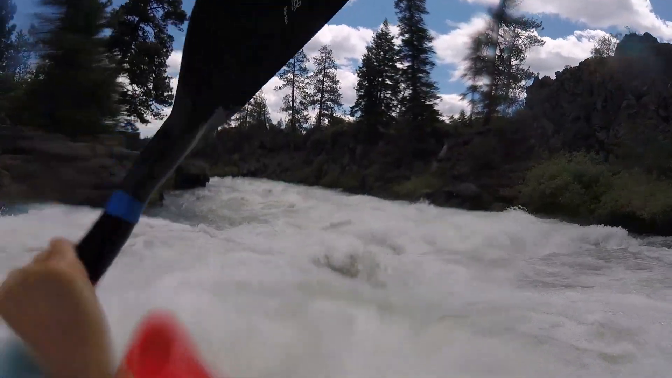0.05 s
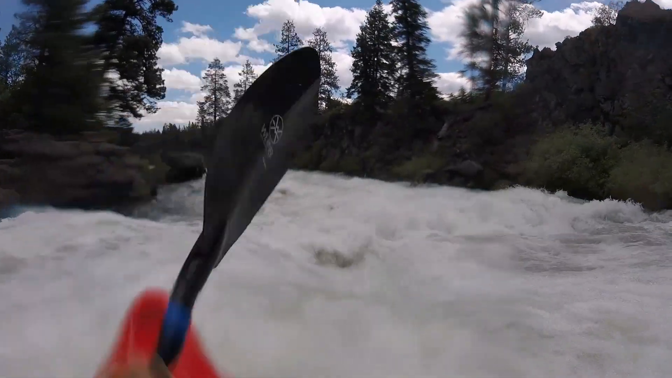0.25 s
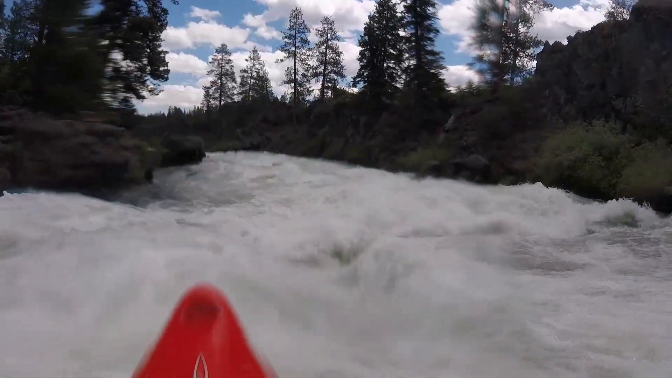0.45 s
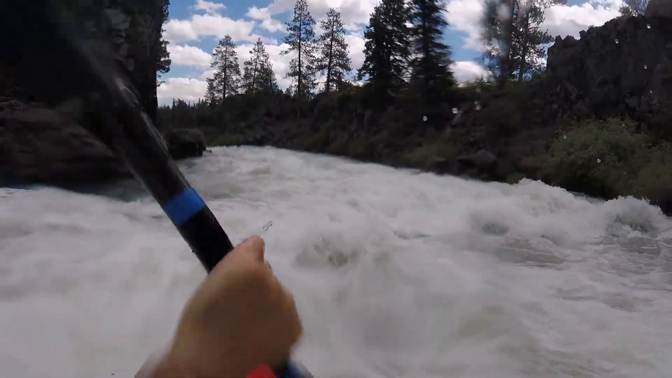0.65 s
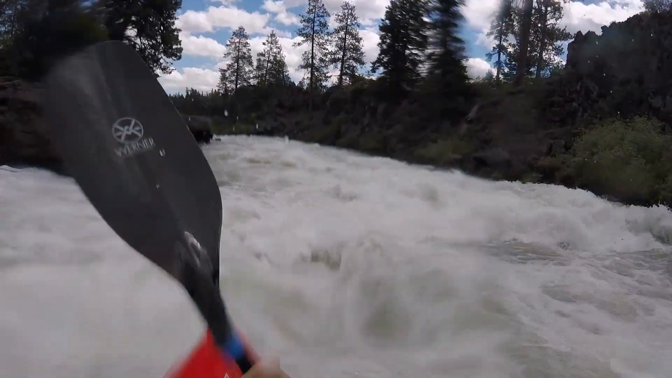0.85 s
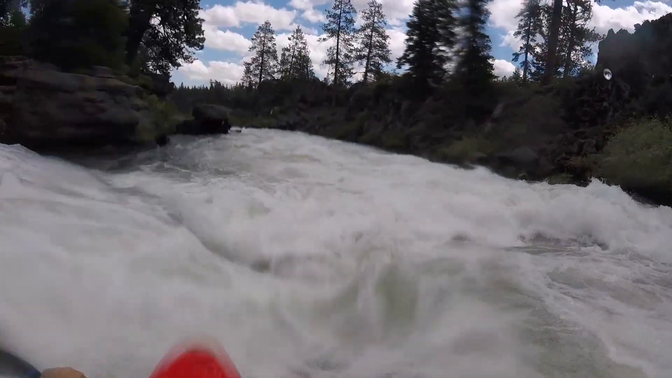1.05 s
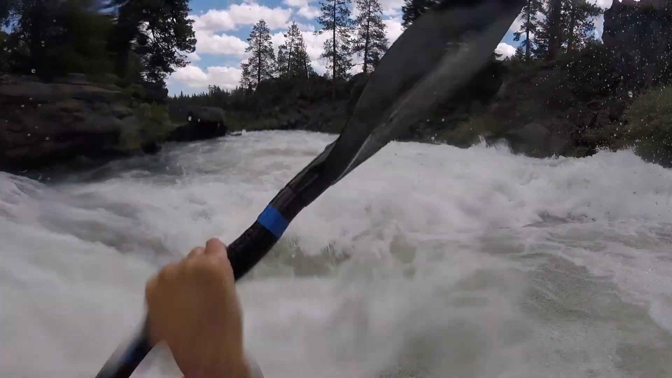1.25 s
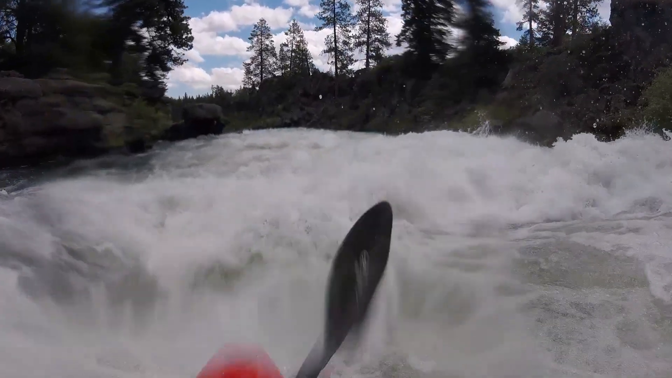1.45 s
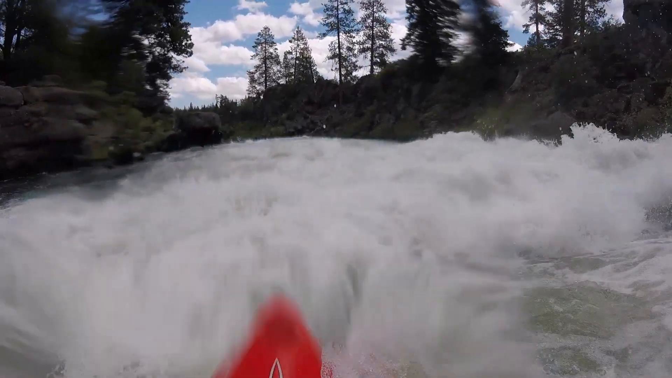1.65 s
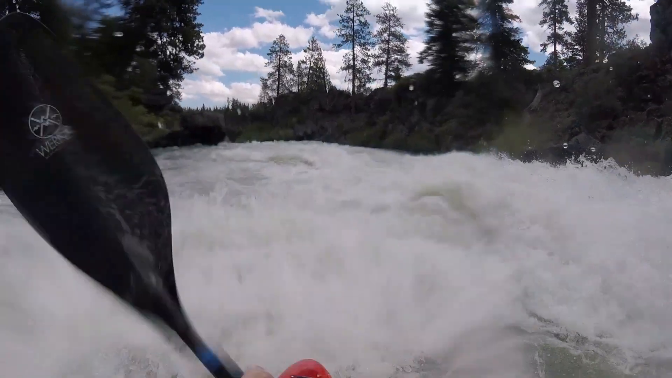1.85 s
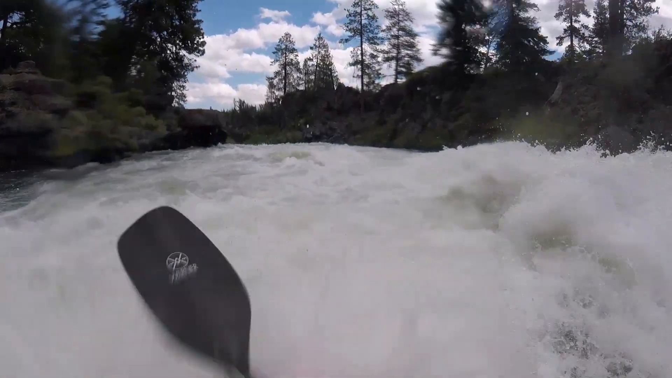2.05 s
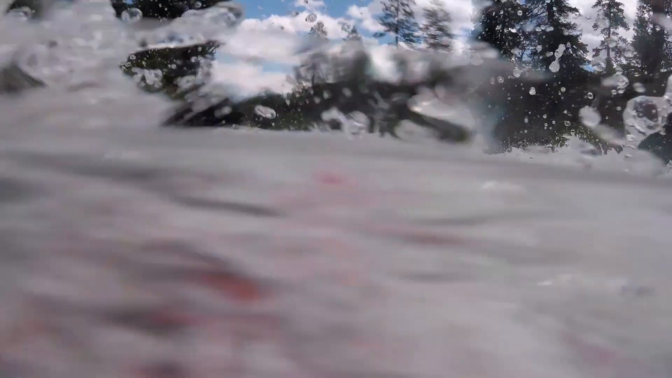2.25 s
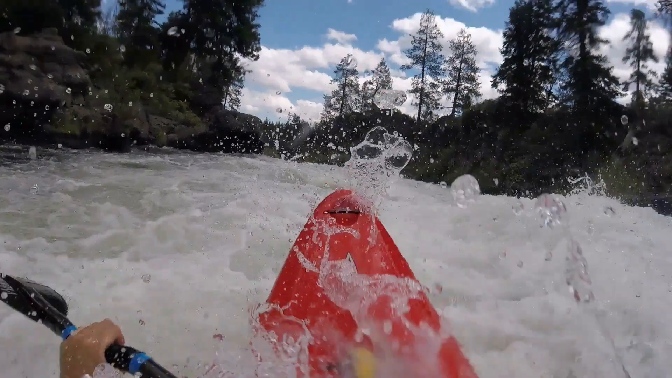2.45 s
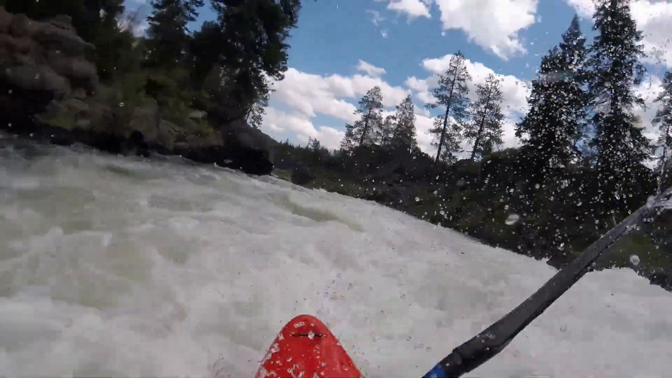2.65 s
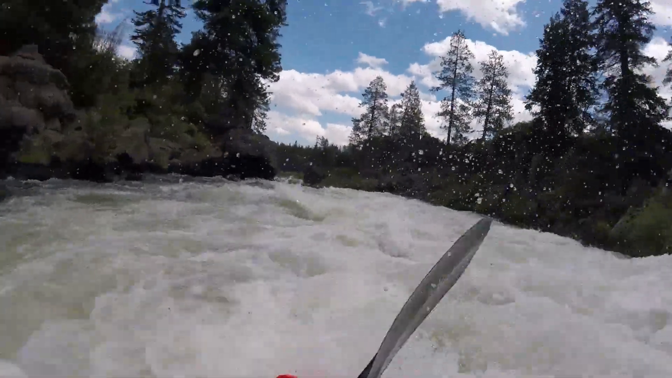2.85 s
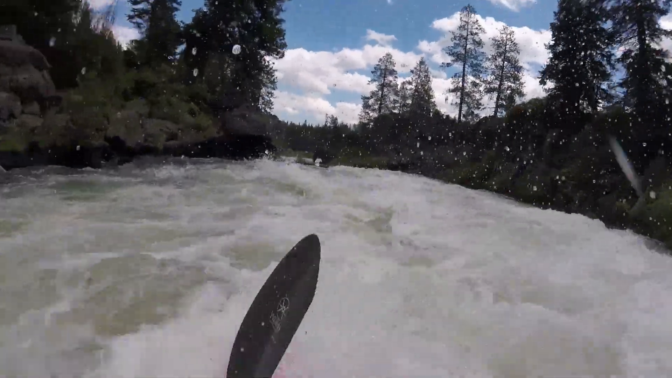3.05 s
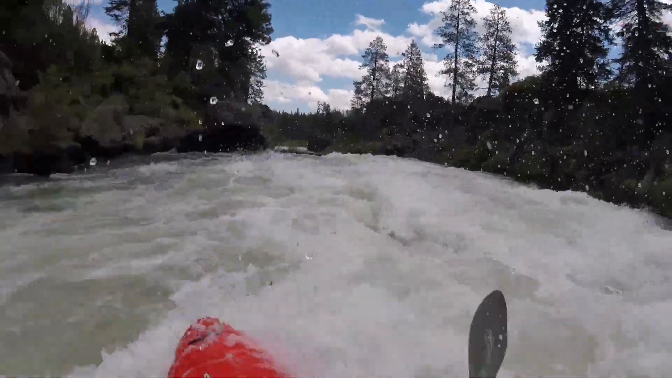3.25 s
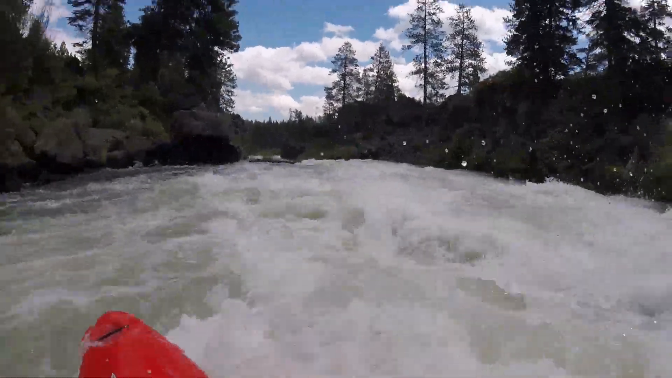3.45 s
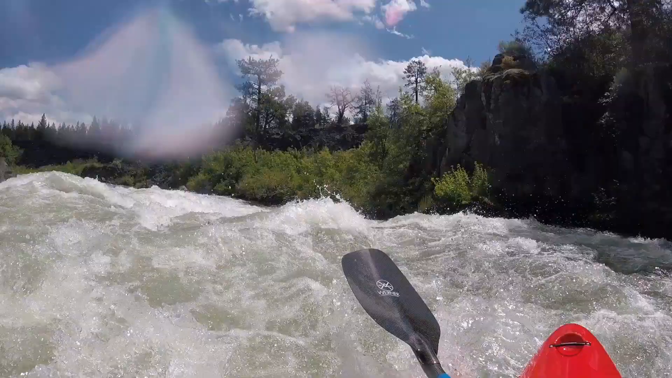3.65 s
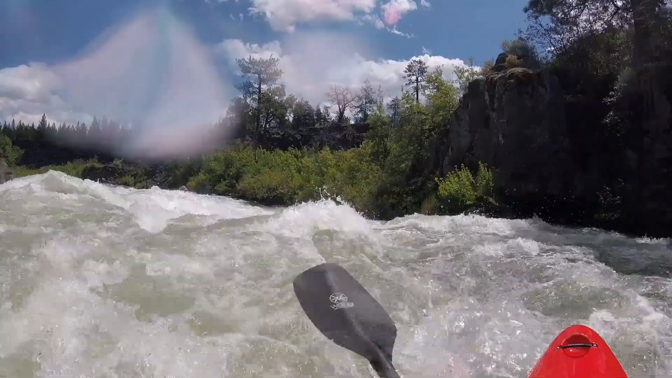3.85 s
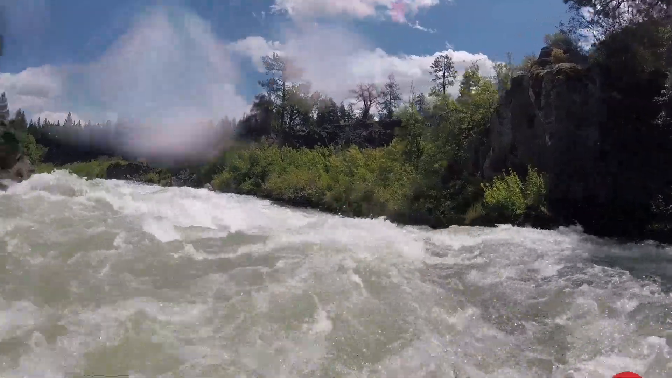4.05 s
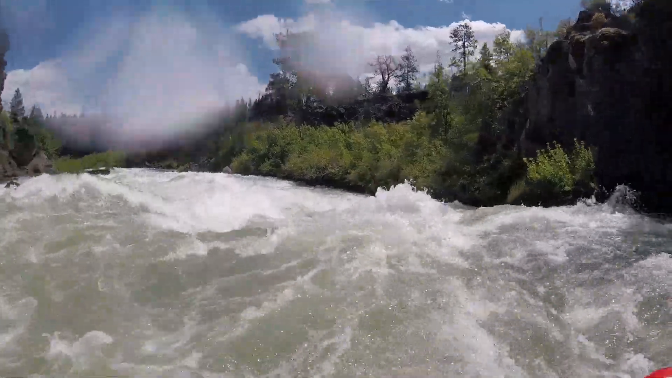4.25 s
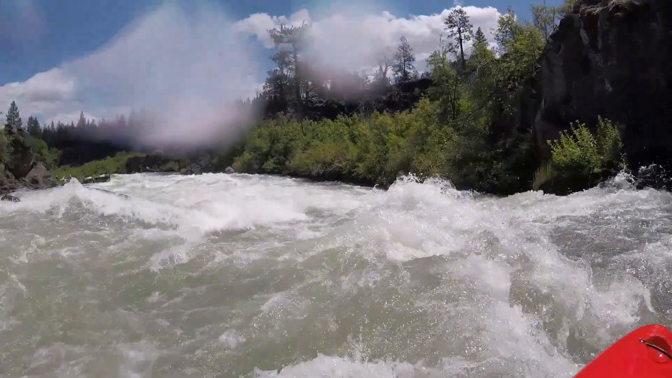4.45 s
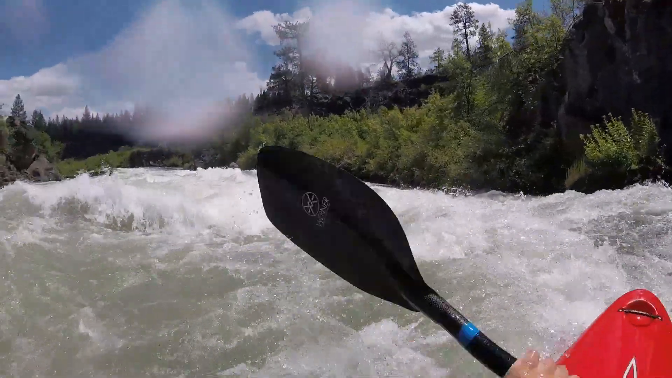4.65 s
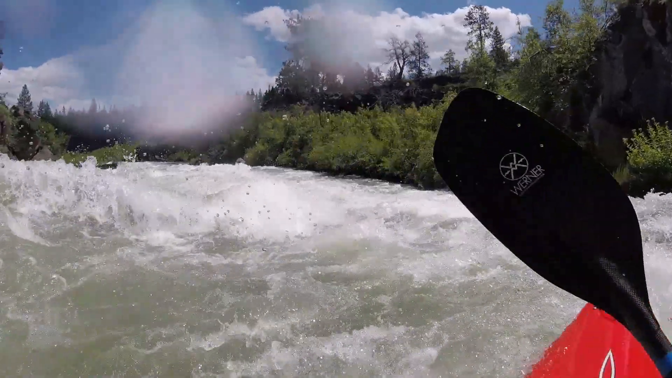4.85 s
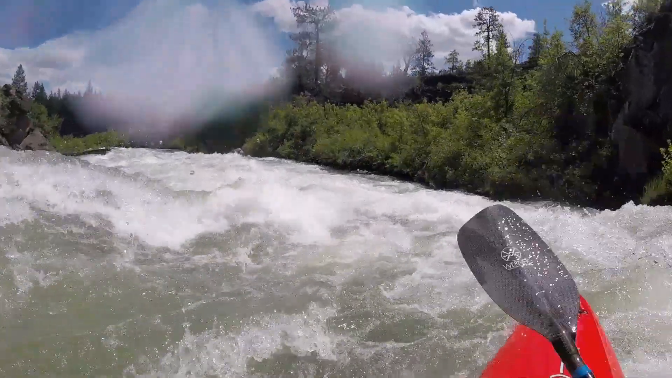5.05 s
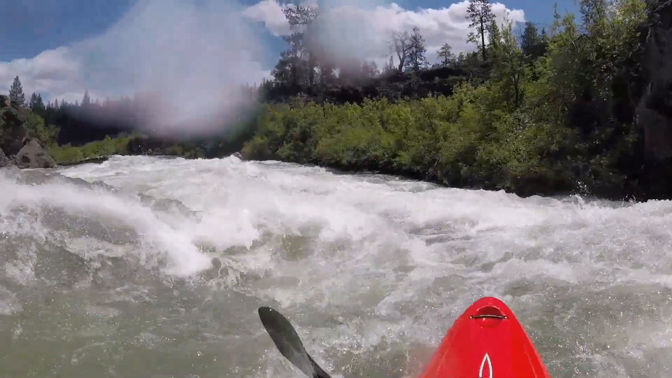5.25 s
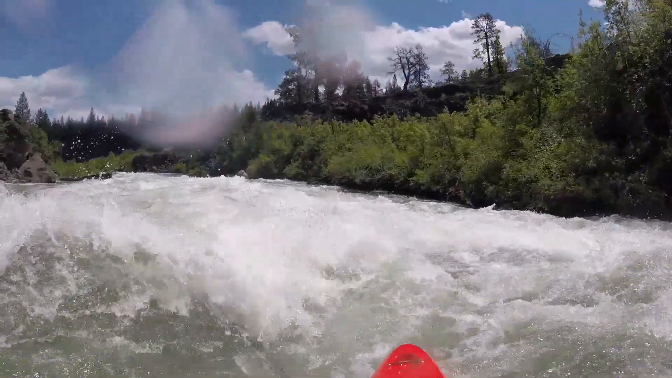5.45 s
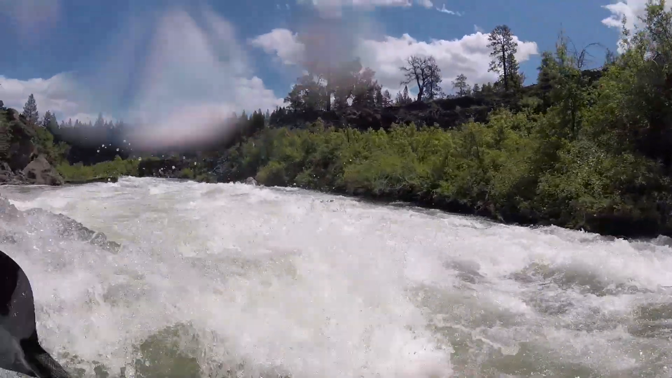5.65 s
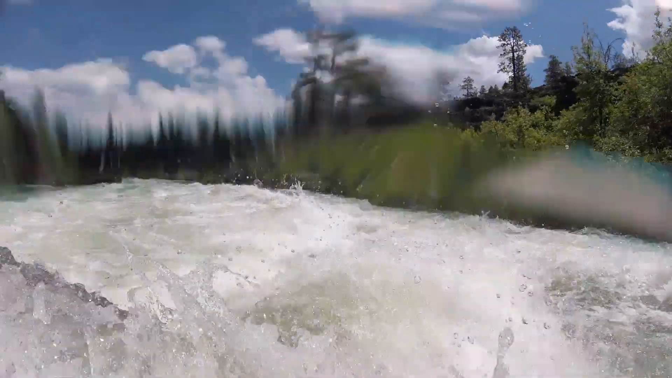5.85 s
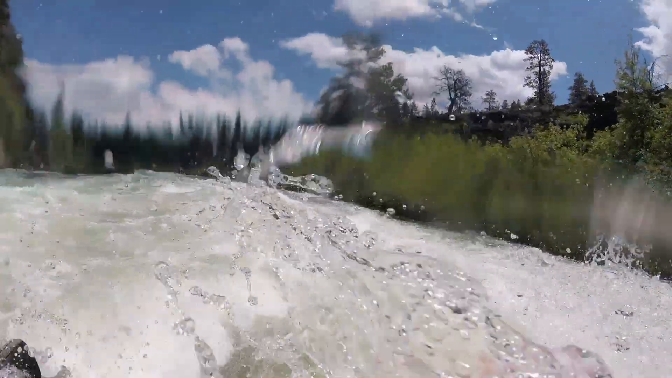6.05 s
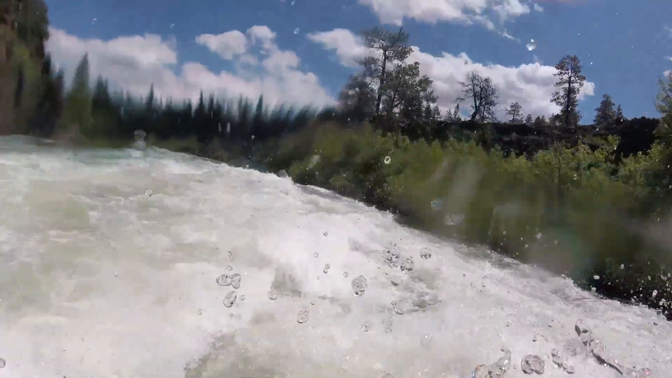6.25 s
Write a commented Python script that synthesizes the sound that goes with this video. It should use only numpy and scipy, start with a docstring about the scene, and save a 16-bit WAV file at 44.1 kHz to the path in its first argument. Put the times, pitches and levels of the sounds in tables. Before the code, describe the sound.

Close on a kayak in rapids, foaming water roars with bassy surges, fizzing spray and hollow hull knocks that crowd together. At nearly two seconds a wave swamps the microphone with a heavy boom and quick sinking gulps. The river turns dull and distant, with drips and a later deep thump, then the full roar returns abruptly through a trembling, faintly ringing film of water.

```python
"""Kayak in whitewater rapids

Surges thud and knock on the hull, the foam roars and spray fizzes: ringing bubbles over wideband noise. A wave
buries the microphone with a few gulps, short throbs that sink in pitch. Its flooded port then muffles the river
(a moving low-pass edge) and slowly drains. Then the scene changes: the roar is back at once, through a
quivering film of water (a moving resonance with a notch above it)."""
import sys
import numpy as np
from scipy import signal
from scipy.fft import rfft, irfft, next_fast_len
from scipy.io import wavfile

SR = 44100
rng = np.random.default_rng(int(sys.argv[2]) if len(sys.argv) > 2 else 0)


def wav_out(sig):
    """Save sig, one row per channel (or a flat mono array), as 16-bit PCM at SR to the path in sys.argv[1]."""
    wavfile.write(sys.argv[1], SR, np.round(np.clip(np.atleast_2d(sig).T, -1, 1) * 32767).astype(np.int16))


N = 278271
TIME = np.arange(N) / SR

# Spectral shape of the river in each state of the port; river() sets the band levels afterwards.
# Columns: frequency_hz, gain_db
OPEN_COLOUR = [(20, 4), (45, 2), (140, -3.5), (250, -10), (490, -14), (1180, -22), (1950, -25), (3200, -30),
               (4200, -34.5), (5100, -23), (5850, -26.5), (6600, -22.5), (9300, -33.5), (10600, -42.5)]
PLUGGED_COLOUR = [(20, 15.5), (130, 6), (260, -5), (450, -17), (1200, -21.5), (2100, -26), (2850, -25),
                  (3400, -29), (4200, -33), (5100, -31), (5900, -32), (7000, -30), (8300, -45),
                  (10000, -76)]
DRAINING_COLOUR = [(20, 4.5), (90, -1.5), (170, -6.5), (260, -12), (420, -14), (850, -19), (1500, -24),
                   (2050, -39), (3000, -32.5), (3600, -39), (4500, -51), (5800, -52), (6800, -48),
                   (7600, -54), (9500, -72)]
FILMED_COLOUR = [(20, 0), (50, 0), (150, -1.5), (250, -7.5), (480, -13), (900, -16.5), (2000, -23),
                 (2800, -27), (4000, -28.5), (5100, -26), (5900, -29), (6600, -24), (9600, -31.5),
                 (10600, -45)]
# Shape of the faint stereo side noise in the first part: frequency_hz, gain_db
SIDE_COLOUR = [(60, -55), (220, -52.5), (780, -45.5), (2830, -37), (5400, -33), (10200, -30.5)]
# Base levels of the river in each state of the port, before river() trims: surge_db, roar_db, spray_db
OPEN_DB = (-12.5, -22, -27.5)
FLOODED_DB = (-29.5, -42.5, -63.5)
DRAINED_DB = (-16, -28.5, -60)
# Base level of the spray behind the film: time_s, level_db
FILMED_SPRAY = [(3.63, -32.5), (3.99, -33), (4.56, -30.5), (4.76, -31.5), (5.29, -27.5), (5.45, -33.5),
                (5.7, -29.5), (6.09, -31.5), (6.3, -30.5)]
# Resonance of the water film over the port: time_s, frequency_hz
FILM_PITCH = [(3.62, 3540), (3.79, 3460), (3.85, 3700), (3.92, 3700), (3.975, 4150), (4.03, 3600),
              (4.09, 3620), (4.15, 3900), (4.24, 3730), (4.285, 3300), (4.34, 3780), (4.44, 3650),
              (4.53, 3480), (4.57, 3370), (4.7, 3300), (4.83, 3770), (4.94, 3580), (4.985, 3840),
              (5.02, 3660), (5.07, 3910), (5.14, 3820), (5.19, 3500), (5.7, 3410), (6.18, 3410),
              (6.29, 3740)]
# Upper edge of the passband of the flooded port: time_s, frequency_hz
SEAL_EDGE = [(1.812, 1700), (1.84, 800), (1.89, 700), (1.912, 2600), (1.95, 2850), (2.06, 2950),
             (2.2, 3500), (2.4, 4000), (3.6, 4320)]
# Waves that lift the bow: centre_s, surge_gain_db, hull_drumming_db, length_s (to 1/e)
SWELLS = [(.17, 1, -17.5, 0.35), (1.547, -0.5, -24, 0.06), (2.958, 6, -44, 0.043), (3.398, 1, -28, 0.08),
          (3.85, -1, -23, 0.41), (4.395, 2, -30, 0.043), (5.042, 1.5, -32, 0.047), (5.667, 0.5, -26, 0.25)]
# Sheets of water over the port: centre_s, treble_loss_db (negative brightens), length_s (to 1/e)
SHEETS = [(0.955, 2.5, 0.027), (1.377, -2, 0.015), (1.543, 6, 0.021), (1.608, 5, 0.017), (5.683, 3.5, 0.16)]
# Showers of spray on the port: centre_s, gain_db (before the band filter), centre_hz, length_s (to 1/e)
SHOWERS = [(0.01, 0, 6900, 0.021), (0.662, 4.5, 7500, 0.016), (1.133, -2, 6000, .03), (1.462, 5, 900, 0.05),
           (1.7875, 4, 4970, .0012), (1.792, 9.5, 6500, 0.0022), (1.805, 3, 3500, .004),
           (2.058, 5, 6150, 0.027), (3.77, 2.5, 2200, 0.01), (5.007, 0, 1990, 0.076),
           (5.245, -2, 2480, .03), (5.305, 4, 4200, 0.011), (5.367, -0.5, 3300, 0.028),
           (5.438, 6.5, 2600, 0.0078), (5.461, 5, 3200, .028)]
# Deep booms as the boat drops onto the water: start_s, peak_db, starting_pitch_hz
BOOMS = [(1.80, -5.5, 104), (1.823, -9, 126), (1.868, -20, 75), (2.925, -9.5, 70), (2.962, -7.5, 62),
         (3.0, -11.5, 49.7)]
# Waves that knock on the hull: start_s, throb_peak_db, starting_pitch_hz
KNOCKS = [(.552, -7, 200), (0.846, -6, 234), (0.945, -4.5, 312), (1.448, -5, 196.6), (1.517, -13, 253),
          (1.531, -7, 278), (1.576, -5, 242), (1.603, -5, 280), (1.731, -7, 202), (1.794, -5.5, 212),
          (4.362, -9.5, 239)]
# Water slapping the housing and the hull: start_s, level_db, centre_hz, t60_s
SLAPS = [(1.788, -17, 900, 0.02), (1.801, -14, 810, 0.04), (1.8285, -18, 1290, 0.027),
         (1.836, -30, 700, 0.084), (2.07, -23, 131, 0.092), (2.767, -31, 1850, 0.04),
         (2.795, -30, 800, 0.045), (2.984, -14.5, 432, 0.06), (2.9845, -19.5, 1080, 0.046),
         (3.396, -21, 850, 0.039)]
# Drops that hit the flooded housing: start_s, snap_peak_db, ring_hz (also the top of the snap's band)
DROPS = [(1.811, -14, 7040), (1.827, -11, 2150), (1.8283, -19.5, 8700), (1.8665, -29, 900),
         (1.8945, -37, 2600), (1.9087, -24.5, 2680), (1.9465, -15, 3600), (2.0088, -14.5, 2760),
         (2.769, -22, 2400), (2.986, -24, 3100)]
# Air pockets that collapse close by: start_s, peak_db, starting_pitch_hz
GULPS = [(1.805, -2.5, 1064), (1.8103, -4, 1900), (1.8252, -8, 1100), (1.8283, -5, 1260), (1.832, -9, 1190),
         (1.834, -11, 880), (1.865, -18, 222), (1.8672, -6.5, 520), (1.868, -16, 740)]

PLUG_S, FILM_S = 1.812, 3.603  # the port floods; the roar returns through a film
SURGE_TOP_HZ, ROAR_TOP_HZ = 300, 4300  # band edges between surge, roar and spray
LATER_SIDE_DB = -19  # change of the side noise level after the first part

HULL_DB = -29.5  # steady drumming while the port is free
KNOCK_SWELL_CYCLES, KNOCK_SAG_CYCLES = 1, 10
GULP_SWELL_CYCLES, GULP_SAG_CYCLES = 0.75, 3.7
SLAP_OCTAVES, SHOWER_OCTAVES = 1.11, 2.1  # bandwidths
SNAP_S, SNAP_DB, SNAP_T60_S = 3.594, -15, 0.003  # a small click just before the roar returns

GURGLES_PER_S, GURGLE_LOW_HZ, GURGLE_HIGH_HZ = 110, 216.4, 1107
DROPLETS_PER_S, DROPLET_SPREAD_DB = 3500, 3.5
# Stray droplets that crackle between the showers
PATTER_DB, PATTER_CLUMP_DB, PATTER_CLUMP_HZ, PATTER_LOW_HZ = -11, 5, 20.5, 1300
SHEET_HZ = 1400  # sheets act above this

APPROACH_DB, APPROACH_S = 4.5, 0.34  # the roar grows as the big wave nears
DRY_PORT_HZ, WET_PORT_HZ = 7830, 9130  # spray raises the open port's resonance
WETTING_S, WETTING_FADE_S = 0.93, 0.44

PLUNGE_DB, PLUNGE_DB_PER_S = 27, 380  # the churn dies away once the port is under water
BACKWASH_DB, BACKWASH_END_S, BACKWASH_FADE_S = 5.5, 2.09, 0.098  # water washes over the housing
RECOVERY_S, RECOVERY_FADE_S = 2.69, 1.5  # middle and length of the return of the level in draining
SLOSH_DB, SLOSH_HZ = 0.5, 15.5  # the muffled river comes in lumps
FLOODED_PORT_HZ, FLOODED_RISE_HZ_PER_S = 6140, 780  # the resonance climbs for 1 s as water runs out
SEAL_WAVER, SEAL_WAVER_HZ = 0.04, 9  # the edge wavers by this share as the water shifts
SEEP_DB = -23  # low and middle range that still seeps past the seal

FILMED_SURGE_DB, FILMED_ROAR_DB = -12.5, -19  # base levels, before river() trims
QUIVER_SPREAD_HZ, QUIVER_RATE_HZ = 30, 24  # the film trembles
UPPER_HZ, UPPER_FOLLOWS = 9050, 0.62  # filmed port's treble resonance; exponent on the film's pitch swing
CUTOFF_HZ = 10550


def from_db(db):
    """Logarithmic measure: decibels to an amplitude ratio."""
    return 10 ** (np.asarray(db) / 20)


def rms_one(x):
    """Power normalisation: scale to unit rms."""
    return x / np.sqrt(np.mean(x ** 2) + 1e-20)


def in_time(rows, times=TIME):
    """Linear interpolation: join each column of a curve by straight lines."""
    s, *columns = np.transpose(rows)
    return [np.interp(times, s, column) for column in columns]


def tinted(x, colour):
    """Spectral shaping: multiply the spectrum by a gain curve on a log-frequency axis."""
    size = next_fast_len(N, True)
    hz, gain_db = np.transpose(colour)
    bins = np.maximum(np.arange(size // 2 + 1) * SR / size, 1)
    gain = from_db(np.interp(np.log(bins), np.log(hz), gain_db))
    return irfft(rfft(x, size) * gain, size)[..., :N]


def passed(x, hz, kind, order=4):
    """Maximally flat passband: a Butterworth filter."""
    return signal.sosfilt(signal.butter(order, hz, kind, fs=SR, output="sos"), x)


def swept(x, track_hz, response):
    """Short-time filtering: apply response(hz, centre_hz) as the centre moves along a track."""
    hz, times, frames = signal.stft(x, SR, nperseg=1024, noverlap=768)
    centre_hz = np.interp(times, TIME, track_hz)
    filtered = frames * response(hz[:, None], centre_hz)
    return signal.istft(filtered, SR, nperseg=1024, noverlap=768)[1][..., :N]


def drift(rate_hz):
    """Low-passed randomness: a slow fluctuation of unit rms, computed at every 40th sample."""
    pole = np.exp(-80 * np.pi * rate_hz / SR)
    noise = rng.standard_normal(N // 40 + 2002)
    slow = signal.lfilter([1], [1, -2 * pole, pole * pole], noise)[2000:]  # skip the settling
    return np.interp(np.arange(N) / 40, np.arange(len(slow)), rms_one(slow))


def after(s, fade):
    """Raised-sine transition: 0 to 1, centred on a moment."""
    return 0.5 + 0.5 * np.sin(np.pi * np.clip((TIME - s) / fade, -0.5, 0.5))


def swell(s, length):
    """Gaussian envelope of height 1: a wave rises and falls."""
    return np.exp(-((TIME - s) / length) ** 2)


def splash(s, t60):
    """Exponential decay: a quick rise, then a steady fall in decibels."""
    return after(s, fade=0.003) * from_db(-60 * np.clip((TIME - s) / t60, 0, 3))


def ring(clicks, hz, t60):
    """Damped resonance: a unit click excites a decaying sine of initial height 1."""
    pole, w = from_db(-60 / (t60 * SR)), 2 * np.pi * hz / SR
    return signal.lfilter([0, np.sin(w)], [1, -2 * pole * np.cos(w), pole * pole], clicks + 1e-18)


def throb(s, hz, swell_cycles, sag_cycles):
    """Transient oscillation: a few cycles swell to height 1 and die, sinking in pitch."""
    cycles = sag_cycles * np.log1p(np.maximum(TIME - s, 0) * hz / sag_cycles)
    grown = np.minimum(cycles / swell_cycles, 20)
    return (grown * np.exp(1 - grown)) ** 2 * np.sin(2 * np.pi * cycles)


def hull(in_air, low_hz, high_hz):
    """Broadband excitation of a hollow body: steady and wave-driven drumming add in power."""
    power = from_db(HULL_DB) ** 2 * in_air
    for s, _, drum_db, length in SWELLS:
        power = power + (from_db(drum_db) * swell(s, length)) ** 2
    drumming = rms_one(passed(rng.standard_normal(N), [low_hz, high_hz], "band", order=3))
    return np.sqrt(power) * drumming


def booms():
    """Low-frequency body motion: the whole hull heaves for a few slow cycles."""
    return sum(from_db(peak_db) * throb(s, hz, KNOCK_SWELL_CYCLES, KNOCK_SAG_CYCLES)
               for s, peak_db, hz in BOOMS)


def knocks(wet_db, wet_t60, low_hz, high_hz):
    """Impact on a cavity: a wave gives the hull a hollow throb with a wet noise smack on top."""
    noise = passed(rng.standard_normal(N), [low_hz, high_hz], "band", order=2)
    smack = from_db(wet_db) * rms_one(noise)
    out = np.zeros(N)
    for s, peak_db, hz in KNOCKS:
        hollow = throb(s, hz, KNOCK_SWELL_CYCLES, KNOCK_SAG_CYCLES)
        out += from_db(peak_db) * (hollow + smack * splash(s, wet_t60))
    return out


def slaps():
    """Turbulent impact: each slap is a decaying burst of band-limited noise."""
    out, half, noise = np.zeros(N), 2 ** (SLAP_OCTAVES / 2), rng.standard_normal(N)
    for s, level_db, hz, t60 in SLAPS:
        churn = rms_one(passed(noise, [hz / half, hz * half], "band", order=6))
        out += from_db(level_db) * churn * splash(s, t60)
    return out


def drops(t60, ring_db, snap_hz, spatter_db, spatter_t60, leak_db, leak_t60):
    """Impulse response: a drop snaps, rings and spatters below its top frequency, plus a thin treble tick."""
    out, spatter = np.zeros(N), from_db(spatter_db) * rng.standard_normal(N)
    for s, peak_db, hz in DROPS:
        click = np.full(N, 1e-18)
        click[round(s * SR)] = 1
        impact = passed(click, snap_hz, "high", order=1) + from_db(ring_db) * ring(click, hz, t60)
        impact = passed(impact + spatter * splash(s, spatter_t60), hz, "low", order=12)
        tick = from_db(leak_db) * ring(click, FLOODED_PORT_HZ, leak_t60)
        out += from_db(peak_db) * (impact / abs(impact).max() + tick)
    return out


def snap():
    """Unipolar pulse: one dry click, a step with exponential decay."""
    age = np.clip((TIME - SNAP_S) / SNAP_T60_S, 0, 3)
    return (age > 0) * from_db(SNAP_DB - 60 * age)


def gulps():
    """Cavity collapse: each air pocket swells and dies within a few cycles."""
    return sum(from_db(peak_db) * throb(s, hz, GULP_SWELL_CYCLES, GULP_SAG_CYCLES)
               for s, peak_db, hz in GULPS)


def bubbles(per_s, cycles, size_db, clump_db, count=30):
    """Bubble resonance: births in clumps, each ringing some cycles; high pitches are the most common."""
    pitches = np.geomspace(450, 10000, count)
    clumps, out = from_db(clump_db * drift(14)), 0
    for hz, share in zip(pitches, pitches / pitches.sum()):
        born = np.flatnonzero(rng.random(N) < per_s * share * clumps / SR)
        sizes = from_db(size_db * np.minimum(rng.exponential(1, len(born)), 4))
        clicks = np.zeros(N)
        clicks[born] = sizes * rng.choice([-1, 1], len(born))
        out = out + np.sqrt(share) * rms_one(ring(clicks, hz, cycles / hz))
    return rms_one(out)


def gurgles(cycles, rise, spread_db):
    """Bubble resonance near a free surface: large bubbles ring low and rise in pitch; rms 1."""
    out = np.zeros(N + SR)
    for when, pitch, size in rng.random((int(GURGLES_PER_S * N / SR), 3)):
        hz = GURGLE_LOW_HZ * (GURGLE_HIGH_HZ / GURGLE_LOW_HZ) ** pitch
        life = np.linspace(0, 1, int(cycles / hz * SR))
        phase = 2 * np.pi * cycles * life * (1 + rise * life / 2)
        bubble = np.sin(phase) * from_db(-60 * life)
        start = int(when * N)
        out[start:start + len(life)] += hz * from_db(spread_db * size) * bubble
    return rms_one(out[:N])


def whitewater(bubble_db, wash_db, gurgle_db, flutter_db):
    """Superposition: near bubbles and gurgles over the smooth noise of countless far ones."""
    near = from_db(bubble_db) * bubbles(per_s=9000, cycles=10.5, size_db=2.5, clump_db=2.5)
    far = from_db(wash_db) * rng.standard_normal(N)
    low = from_db(gurgle_db) * gurgles(cycles=17, rise=0.17, spread_db=15.5)
    return rms_one(near + far + low) * from_db(flutter_db * drift(48))


def droplets():
    """Shot noise: tiny random impacts of uneven size; rms 1."""
    sizes = from_db(DROPLET_SPREAD_DB * np.minimum(rng.exponential(1, N), 3))
    signed = sizes * rng.choice([-1, 1], N)
    return rms_one(signed * (rng.random(N) < DROPLETS_PER_S / SR))


def showers(hiss_db):
    """Modulated shot noise: clumped patter, and showers that swell and fade as a crackling hiss."""
    clump_db = PATTER_CLUMP_DB * np.minimum(drift(PATTER_CLUMP_HZ), 2)
    out = from_db(PATTER_DB + clump_db) * passed(droplets(), PATTER_LOW_HZ, "high", order=2)
    half = 2 ** (SHOWER_OCTAVES / 2)
    spray = rms_one(droplets() + from_db(hiss_db) * rng.standard_normal(N))
    for s, gain_db, hz, length in SHOWERS:
        band = [hz / half, min(hz * half, SR / 2 - 1000)]
        out += from_db(gain_db) * swell(s, length) * passed(spray, band, "band", order=2)
    return out


def wet_port(x, pitch_hz, width_hz, peak_db):
    """Cavity resonance: the wet port lifts a broad treble peak along a track of pitch."""
    def response(hz, centre_hz):
        return from_db(peak_db / (1 + ((hz - centre_hz) / width_hz) ** 2))
    return swept(x, pitch_hz, response)


def water_film(x, pitch_hz, sharpness, notch_ratio, notch_sharpness):
    """Membrane resonance and antiresonance: a moving peak with a notch just above it."""
    def response(hz, film_hz):
        ratio = hz / film_hz
        peak = 1 - ratio ** 2 + 1j * ratio / sharpness
        notch = 1 - (ratio / notch_ratio) ** 2 + 1j * ratio / notch_ratio / notch_sharpness
        return abs(notch / peak)
    return swept(x, pitch_hz, response)


def sheets(x):
    """Frequency-dependent transmission: a passing sheet spares the bass and changes the treble level."""
    bass = passed(x, SHEET_HZ, "low", order=1)
    loss_db = sum(depth_db * swell(s, length) for s, depth_db, length in SHEETS)
    return bass + (x - bass) * from_db(-loss_db)


def river(water, levels, heave_db, surge_db, roar_db, spray_db):
    """Band decomposition: heaving surges in the bass, foam in the middle, fine spray on top."""
    surge_level, roar_level, spray_level = levels
    lift_db = sum(gain_db * swell(s, length) for s, gain_db, _, length in SWELLS)
    bass = passed(water, SURGE_TOP_HZ, "low", order=5)
    surge = rms_one(bass * from_db(heave_db * drift(9.1)))
    above = passed(water, SURGE_TOP_HZ, "high", order=5)
    roar = rms_one(passed(above, ROAR_TOP_HZ, "low", order=9))
    spray = rms_one(passed(above, ROAR_TOP_HZ, "high", order=9))
    out = surge * from_db(surge_level + lift_db + surge_db)
    out = out + roar * from_db(roar_level + roar_db)
    return out + spray * from_db(spray_level + spray_db)


def open_levels(surge_share):
    """Exponential approach: the roar, and a share of the surge, build up towards the big wave."""
    surge_db, roar_db, spray_db = OPEN_DB
    near_db = APPROACH_DB * np.exp(np.minimum(TIME - PLUG_S, 0) / APPROACH_S)
    return surge_db + surge_share * near_db, roar_db + near_db, spray_db


def muffled_levels(surge_share, spray_share):
    """Decay and recovery: churn dies fast, backwash lingers, levels ease from flooded to drained."""
    churn_db = np.maximum(PLUNGE_DB - PLUNGE_DB_PER_S * np.maximum(TIME - PLUG_S, 0), 0)
    wash_db = BACKWASH_DB * (1 - after(BACKWASH_END_S, BACKWASH_FADE_S))
    back = after(RECOVERY_S, RECOVERY_FADE_S)
    surge_db, roar_db, spray_db = (low + (high - low) * back for low, high in zip(FLOODED_DB, DRAINED_DB))
    roar_db = roar_db + np.maximum(churn_db, wash_db)
    return surge_db + surge_share * churn_db, roar_db, spray_db + spray_share * churn_db


def muffled(water, leak_hz, leak_db, unseal_s, drain_s, drain_fade):
    """Low-pass transmission through water: the passband opens and the colour shifts as the port drains."""
    levels = muffled_levels(surge_share=0.27, spray_share=0.62)
    water = water * from_db(SLOSH_DB * drift(SLOSH_HZ))
    port_hz = FLOODED_PORT_HZ + FLOODED_RISE_HZ_PER_S * np.clip(TIME - PLUG_S, 0, 1)
    plugged = wet_port(tinted(water, PLUGGED_COLOUR), port_hz, width_hz=400, peak_db=12)
    plugged = river(plugged, levels, heave_db=1.5, surge_db=1.5, roar_db=-3.5, spray_db=8.0)
    draining = tinted(water, DRAINING_COLOUR)
    draining = river(draining, levels, heave_db=1.6, surge_db=0.0, roar_db=1.0, spray_db=-4.0)
    drained = after(drain_s, drain_fade)
    mixed = plugged * (1 - drained) + draining * drained
    seal_hz = in_time(SEAL_EDGE)[0] * (1 + SEAL_WAVER * drift(SEAL_WAVER_HZ))
    dull = swept(mixed, seal_hz, lambda hz, edge_hz: 1 / np.sqrt(1 + (hz / edge_hz) ** 16))
    seep = from_db(SEEP_DB) * passed(mixed, ROAR_TOP_HZ, "low")
    # The treble leak rises from leak_db to full level around unseal_s.
    leak_gain = from_db(leak_db * (1 - after(unseal_s, fade=0.016)))
    return dull + seep + passed(mixed, leak_hz, "high", order=10) * leak_gain


def scene():
    """Transmission of one river through an open, a flooded and a filmed port; side noise wider at first."""
    river_mid = whitewater(bubble_db=-3.5, wash_db=1.5, gurgle_db=-17, flutter_db=0.5) + showers(hiss_db=-3)
    side = tinted(rng.standard_normal(N), SIDE_COLOUR) * [[1], [-1]]  # opposite sign in the two channels
    wide, narrow = river_mid + side, river_mid + from_db(LATER_SIDE_DB) * side

    port_hz = DRY_PORT_HZ + (WET_PORT_HZ - DRY_PORT_HZ) * after(WETTING_S, WETTING_FADE_S)
    clear = wet_port(tinted(wide, OPEN_COLOUR), port_hz, width_hz=660, peak_db=6.0)
    clear_levels = open_levels(surge_share=0.77)
    clear = river(clear, clear_levels, heave_db=1.45, surge_db=0.5, roar_db=-0.5, spray_db=0.5)

    flooded = muffled(narrow, leak_hz=4750, leak_db=-26, unseal_s=1.91, drain_s=2.35, drain_fade=0.96)

    film_hz = in_time(FILM_PITCH)[0] + QUIVER_SPREAD_HZ * drift(QUIVER_RATE_HZ)
    upper_hz = UPPER_HZ * (film_hz / film_hz[TIME > FILM_S].mean()) ** UPPER_FOLLOWS
    filmed = wet_port(tinted(narrow, FILMED_COLOUR), upper_hz, width_hz=550, peak_db=11)
    filmed = water_film(filmed, film_hz, sharpness=12.4, notch_ratio=1.105, notch_sharpness=14.4)
    film_levels = (FILMED_SURGE_DB, FILMED_ROAR_DB, in_time(FILMED_SPRAY)[0])
    filmed = river(filmed, film_levels, heave_db=0.5, surge_db=0.0, roar_db=0.58, spray_db=1.5)

    plug, burst = after(PLUG_S, fade=0.0059), after(FILM_S, fade=0.021)
    heard = sheets(clear * (1 - plug) + flooded * (plug - burst) + filmed * burst)
    boat = hull(1 - plug + burst, low_hz=154, high_hz=353)
    boat = boat + knocks(wet_db=-14.5, wet_t60=0.058, low_hz=400, high_hz=1000)
    ticks = drops(t60=0.008, ring_db=-44, snap_hz=250, spatter_db=-31, spatter_t60=0.032,
                  leak_db=-29, leak_t60=0.005)
    return heard + boat + booms() + gulps() + slaps() + ticks + snap()


def record(dry):
    """Band limiting and saturation: deepest bass removed, highest peaks rounded, top cut."""
    heard = passed(dry, 12, "high", order=2)
    rounded = heard / (1 + (heard / 0.97) ** 8) ** (1 / 8)
    return signal.sosfilt(signal.ellip(10, 0.2, 80, CUTOFF_HZ, fs=SR, output="sos"), rounded)


dry = scene()
out = record(dry)
wav_out(out)
```